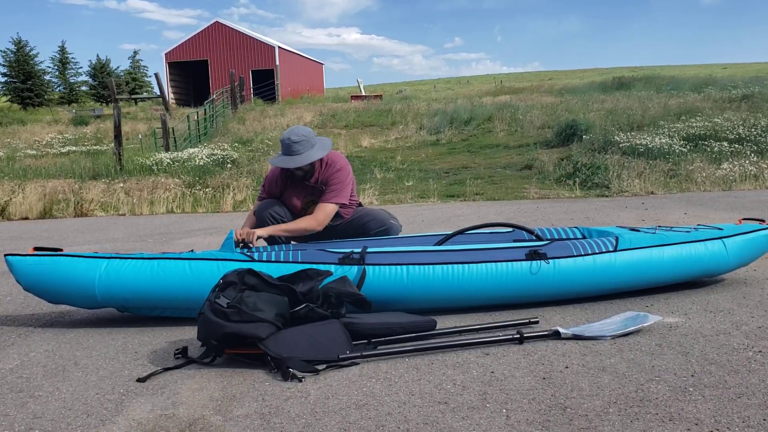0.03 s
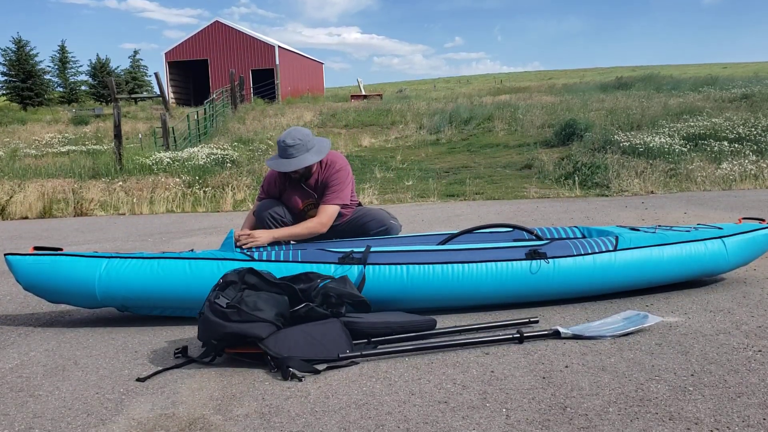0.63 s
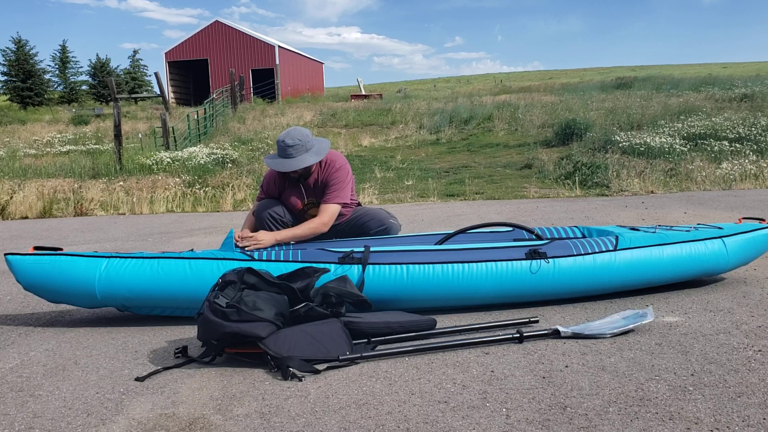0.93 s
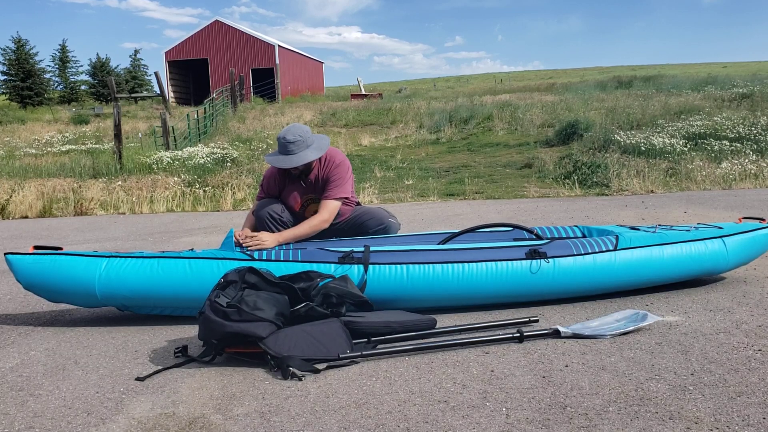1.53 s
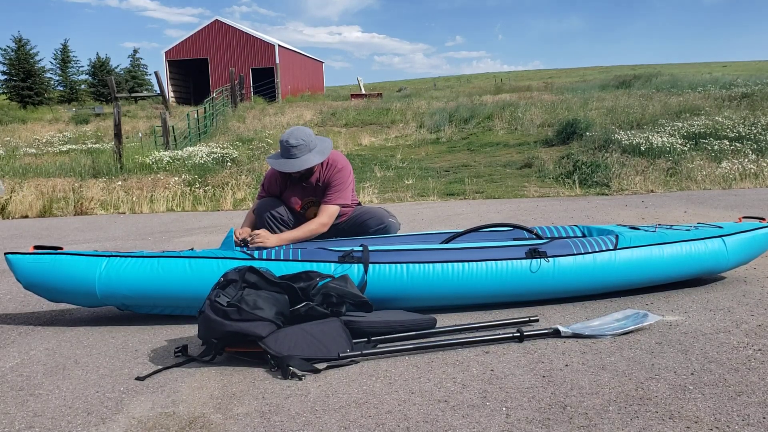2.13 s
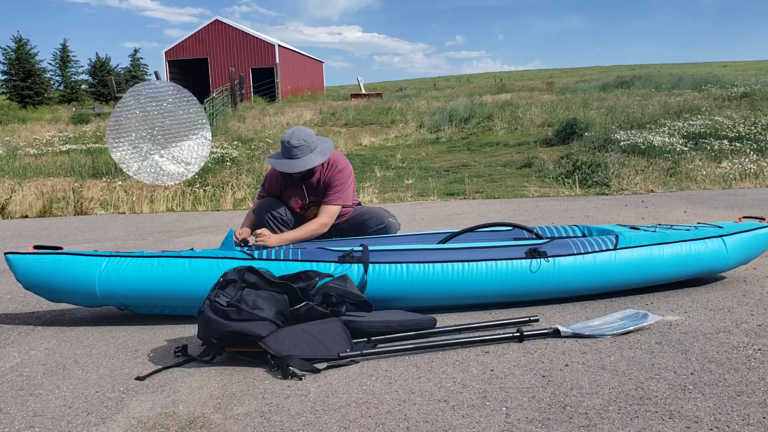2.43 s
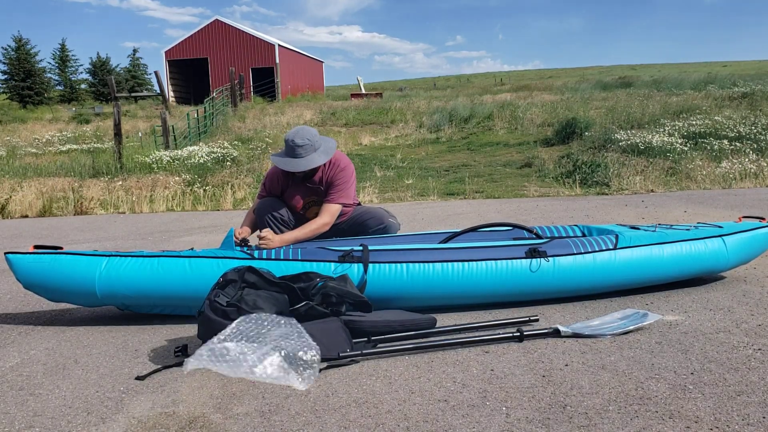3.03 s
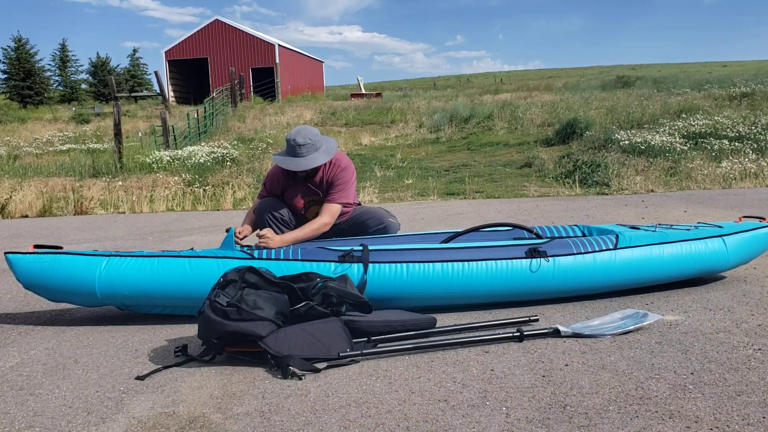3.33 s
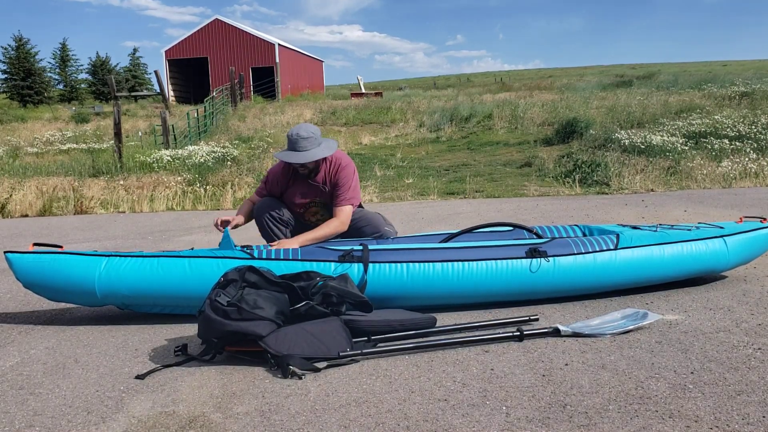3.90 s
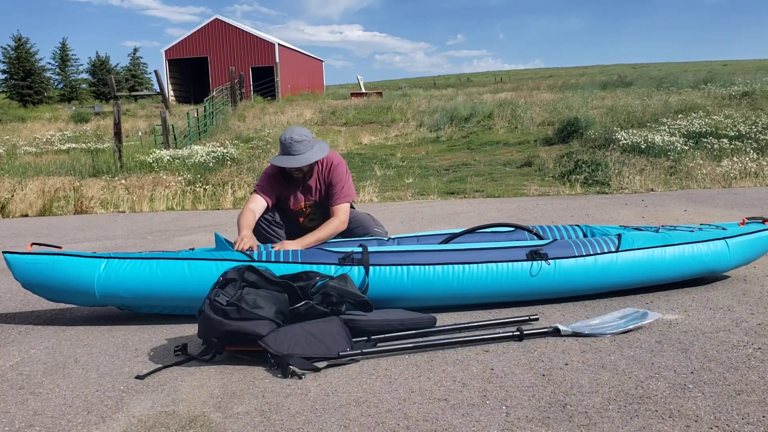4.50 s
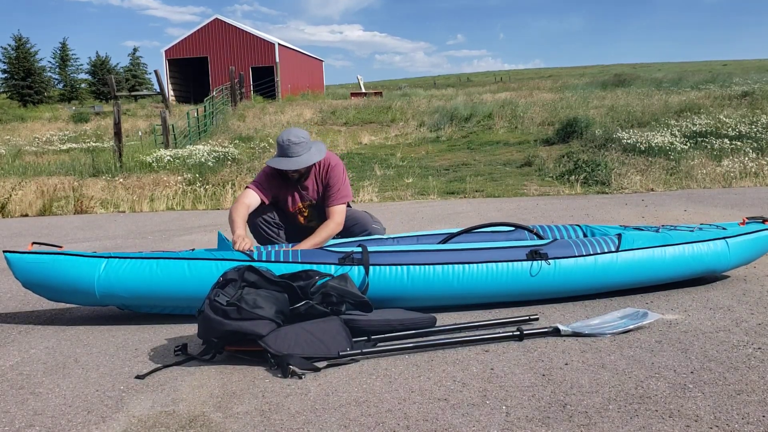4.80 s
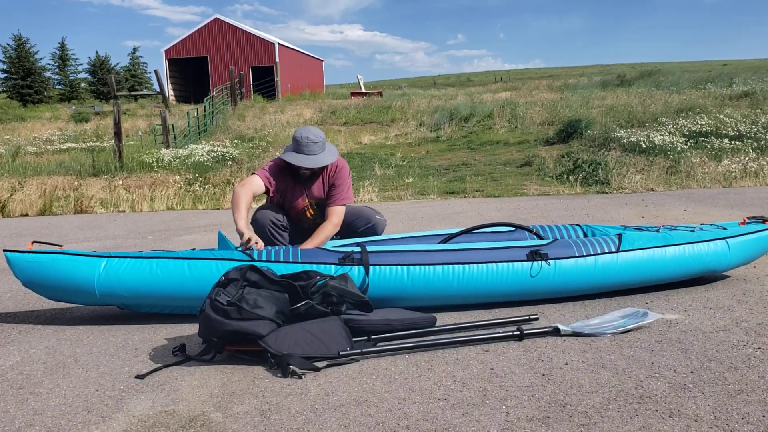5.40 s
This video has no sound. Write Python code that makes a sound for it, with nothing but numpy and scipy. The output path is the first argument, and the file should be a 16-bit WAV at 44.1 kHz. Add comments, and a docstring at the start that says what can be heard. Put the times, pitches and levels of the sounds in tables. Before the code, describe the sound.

Amid dull knocks and gusty wind rumble, air spurts from a kayak valve, blasts out and hisses away.

```python
"""Letting the air out of a kayak

Outdoors, hands rustle and squeak on an inflatable kayak. Air seeps past the cap, then the valve spits
twice, opens with a blast and hisses out as the pressure falls. Wind buffets the two microphone ports,
mixed with sharper handling knocks. Birds twitter far off, and a thin whistle arches near the end."""
import sys
import numpy as np
from scipy import signal
from scipy.fft import rfft, irfft, next_fast_len
from scipy.io import wavfile
from scipy.ndimage import map_coordinates

SR = 44100
rng = np.random.default_rng(int(sys.argv[2]) if len(sys.argv) > 2 else 0)


def file_out(sig):
    """Save sig as 16-bit WAV at sys.argv[1]."""
    # one column per channel
    cols = np.atleast_2d(sig).T
    # limit, then scale
    lim = np.clip(cols, -1, 1)
    pcm = np.round(lim * 32767).astype(np.int16)
    wavfile.write(sys.argv[1], SR, pcm)


N = 244755
TIME = np.arange(N) / SR

# Hands stroke the kayak's skin. Each row: start in seconds, level in dB, length in seconds.
HAND_STROKES = [(0.0, -54.5, 0.0057), (.31, -64, 0.065), (.6, -60.5, .22), (.69, -53, 0.41),
                (1.15, -50.5, 0.18), (1.56, -59.5, 0.057), (4.78, -61, 0.088), (5.275, -61.5, 0.017),
                (5.44, -61, .1)]
# Fingers tick on the plastic. Each row: start in seconds, level in dB.
FINGER_TICKS = [(0.696, -44), (0.836, -40.5), (0.897, -36.5), (1.013, -42), (1.228, -42), (2.1, -46),
                (3.55, -25.5)]
# The wind on the ports. Each row: time in seconds, strength in dB.
WIND_STRENGTH = [(0.0, -56.5), (0.49, -45.5), (0.55, -37.5), (1.06, -43.0), (1.21, -35), (1.6, -38.5),
                 (1.63, -50.5), (1.82, -25.5), (1.96, -53), (2.11, -34.5), (2.28, -64), (2.41, -53.0),
                 (2.59, -68.5), (2.69, -53), (2.77, -57), (2.9, -51.5), (3.52, -34.5), (3.63, -50.0),
                 (3.8, -41), (4.35, -49.5), (4.68, -42.5), (4.8, -54), (4.87, -51.5), (5.25, -55.5),
                 (5.33, -38.0), (5.54, -41)]
# Big swirls of air thump the ports. Each row: start in seconds, level in dB.
WIND_THUMPS = [(0.032, -42), (0.193, -43), (.545, -32.5), (0.674, -32.5), (0.819, -30.5), (.95, -39),
               (1.22, -29), (1.816, -30), (1.869, -25.5), (2.83, -45.5), (3.329, -26.5), (3.678, -34),
               (4.099, -38), (4.58, -37.5), (4.66, -41)]
# Skin drags on rubber. Each row: start in seconds, level in dB, length in seconds, pitch in Hz.
RUBBER_SQUEAKS = [(0.043, -51, 0.0065, 1340), (1.193, -58.5, 0.13, 2600), (1.26, -44, 0.012, 1590),
                  (1.321, -50, 0.0072, 1630), (2.131, -58, 0.22, 2780), (4.248, -39, 0.032, 650),
                  (4.388, -56, 0.022, 2310), (4.769, -59.5, 0.058, 1000)]
# Dull wind buffets on the microphone, mixed with sharper handling knocks.
# Each row: start in seconds, level in dB, pitch in Hz, slap boost in dB.
BUFFETS_AND_KNOCKS = [(0.604, -26.5, 338, -15), (0.814, -28, 338, -28), (1.227, -23.5, 260, -7.5),
                      (1.25, -25.5, 450, -11), (1.442, -46, 376, -21), (1.514, -26, 389, -17),
                      (1.718, -29.5, 637, -10), (1.752, -16.5, 259, -28), (1.767, -21.5, 345, -28),
                      (1.813, -16, 401, -28), (1.859, -17, 389, -38), (1.92, -39.5, 414, 1),
                      (1.979, -31, 353, -1), (2.037, -30, 380, -35), (2.326, -36.5, 527, -30),
                      (2.647, -29.5, 309, -9), (3.103, -32, 547, -25), (3.159, -32, 673, 2),
                      (3.273, -30.5, 340, 3), (3.317, -22, 396, -8.5), (3.342, -15.5, 333, -4.5),
                      (3.526, -23, 416, -32.5), (3.813, -25.5, 322, -3), (3.906, -23, 396, -5),
                      (3.923, -21.5, 366, -1), (4.506, -27, 324, -5), (4.633, -27.5, 450, -40),
                      (4.878, -37, 345, -24)]
# Spurts of leaking air. The rows up to 2.7 s pass the cap; the last two are a faint leak at the valve between
# spits and a puff as the pin lets go. Each row: start in seconds, level in dB, length in seconds.
LEAK_SPURTS = [(2.06, -51.5, 0.029), (2.245, -56.5, 0.042), (2.378, -51.5, 0.028), (2.495, -57.5, 0.063),
               (2.575, -43, 0.0029), (2.632, -42.5, 0.018), (3.21, -55, .14), (4.43, -54, 0.1)]
# The valve pin is pressed. Each row: start in seconds, level in dB, length and fade time in seconds.
PIN_PRESSES = [(3.08, -30.5, 0.019, 0.1), (3.148, -23.5, 0.011, 0.083), (3.16, -17.5, 0.0026, 0.022),
               (3.192, -34.5, 0.0055, 0.11), (3.349, -23, 0.014, 0.049), (3.361, -18.5, 0.022, 0.068),
               (3.819, -43.5, 0.027, 0.11), (4.243, -43, .021, 0.17), (4.367, -48.5, 0.031, 0.16)]
# The notes of the valve's hollow well. Each row: pitch in Hz, width in Hz, level in dB.
WELL_NOTES = [(615, 63, -3), (1155, 36, -1.5), (1390, 190, -4.5), (1580, 65, 2), (1805, 140, -4),
              (2025, 150, -9), (2203, 31, -6)]
# Breathy tones at the valve's lip. Each row: settled pitch in Hz, extra pitch at the opening in Hz,
# level in dB compared with the flow, fade in dB per second, width in Hz.
VALVE_LIP_TONES = [(4460, 830, -2.5, 16.5, 510), (10000, 71, -6.5, 20, 440)]
# The whistle's path. Each row: time in seconds, pitch in Hz, level in dB.
WHISTLE_PATH = [(4.5, 6100, -82), (4.58, 6150, -67), (4.72, 6770, -68), (4.85, 6100, -81), (5.3, 4960, -78),
                (5.55, 4450, -82)]

# The tone colours of the noises. Each row: frequency in Hz, relative level in dB.
RUB_COLOUR = [(700, 10.5), (1500, 2), (2600, -3), (4000, -2.5), (6000, 0.5), (8000, -3), (10500, 1.5),
              (15500, -3.5)]  # hands on the kayak
TICK_COLOUR = [(1500, -7), (4000, -6), (7000, -2), (11000, 1), (15500, -2)]  # fingers on plastic
RUMBLE_COLOUR = [(15, -14), (30, -15), (55, -0.5), (100, -1), (170, -7.5), (300, -22), (600, -16),
                 (1500, -82)]  # deep wind
FLUTTER_COLOUR = [(60, -14), (150, -11), (280, -1), (410, -1), (580, -10.5), (800, -17), (1200, -25),
                  (1800, -42.5), (3000, -65), (8000, -86)]  # hollow wind
FIELD_COLOUR = [(40, 23.5), (150, -16), (450, 21.5), (900, 8.5), (1500, 8.5), (2500, -3), (4400, -5),
                (6400, 2.5), (7400, -4.5), (8300, -10), (9100, -1.5), (10500, 5.5), (13500, -2.5),
                (15500, 4.5)]  # the open field
SHUDDER_COLOUR = [(40, -30), (120, -7.5), (250, 4), (400, 2.5), (600, 0.5), (900, -19.5), (1400, -27.5),
                  (2200, -76), (6000, -93)]  # the dull part of a buffet or knock
SLAP_COLOUR = [(400, 5), (800, 7), (1200, 8), (1700, -3), (2500, -16), (4500, -21), (9000, -25)]  # its sharper slap
LEAK_COLOUR = [(900, 1.5), (1800, -1.5), (2600, -2.5), (3500, -4), (4500, -3.5), (5400, 3), (6600, 4.5),
               (7700, -4), (9000, -3), (11500, 1.5), (13500, -2), (15500, 1.5)]  # thin leaking air, past the cap and later at the valve
SPIT_COLOUR = [(300, -8), (700, -6), (1000, -9), (1500, 0.5), (2100, -3.5), (2700, -1), (3600, -2.5),
               (4400, 3.5), (5700, -2), (6900, 0.5), (8700, -5), (10200, 5), (12800, 1.5), (14700, 5.5),
               (16000, -4)]  # the spitting valve
FLOW_COLOUR = [(300, -29), (700, -59), (1050, 0), (1550, 2.5), (2050, -5), (2600, -3.5), (3400, -1),
               (4500, -1), (5900, -11), (6900, -3.5), (8500, -10), (10100, -18), (12800, -5), (15200, -6.5)]  # the open valve's main hiss
TREBLE_COLOUR = [(6000, -12), (9200, -13.5), (10000, -5.5), (11200, -11), (12000, -7), (13000, -4),
                 (14800, -10), (16000, 0)]  # its bright top

OPEN_S, SHUT_S = 3.385, 4.45  # the pin stays down between these times


def amp(db):
    """Turn decibels into a gain."""
    return np.exp(np.maximum(db, -200) * (np.log(10) / 20))


def unit(x):
    """Scale a signal to an average (rms) level of 1."""
    return x / np.sqrt(np.mean(x ** 2) + 1e-20)


def curves(rows):
    """Join rows into one unbroken line for each column after the time."""
    times, *columns = np.transpose(rows)
    return [np.interp(TIME, times, column) for column in columns]


def gate(start, end, rise, t60):
    """Swell from start, hold until end, then fade by 60 dB every t60 seconds."""
    return (1 - np.exp(-np.maximum(TIME - start, 0) / rise)) * amp(-60 * np.maximum(TIME - end, 0) / t60)


def bursts(rows, rise, t60):
    """The combined strength of bursts that all swell and fade alike."""
    return np.sqrt(sum((amp(db) * gate(s, s + length, rise, t60)) ** 2 for s, db, length in rows))


def wobble(rate):
    """A smooth curve through `rate` random points a second."""
    return map_coordinates(rng.standard_normal(int(N * rate / SR) + 4), [TIME * rate])


def filtered(x, response):
    """Turn each frequency up or down by the gain that `response` gives it."""
    n = x.shape[-1]
    padded = next_fast_len(n + 8192)
    return irfft(rfft(x, padded) * response(np.fft.rfftfreq(padded, 1 / SR)), padded)[..., :n]


def coloured(x, colour):
    """Give a signal a tone colour, at level 1."""
    points_hz, db = np.transpose(colour)
    return unit(filtered(x, lambda hz: amp(np.interp(np.log(hz + 1), np.log(points_hz), db))))


def noise(colour, samples=N):
    """Coloured noise, different at the two ports."""
    return coloured(rng.standard_normal((2, samples)), colour)


def band(x, centre_hz, width_hz):
    """Keep mostly the frequencies near centre_hz."""
    return filtered(x, lambda hz: 1 / (1 + (2 * (hz - centre_hz) / width_hz) ** 2))


def breathy(hz, width_hz):
    """A narrow band of noise around a pitch that may glide."""
    drift = band(rng.standard_normal((2, 2, N)), 0, width_hz)
    phase = 2 * np.pi * np.cumsum(hz * np.ones(N)) / SR
    return unit(drift[0] * np.cos(phase) + drift[1] * np.sin(phase))


def rush(colour, lag_ms, echo, t60, wash, merge_hz=1400):
    """Rushing noise heard directly, as quick echoes off hull and ground, and as a wash from all around."""
    t = np.arange(SR // 25) / SR
    paths = rng.standard_normal((2, len(t))) * amp(-60 * t / t60) * (t > 0.003)
    paths *= echo / np.linalg.norm(paths, axis=1, keepdims=True)
    lag = round(lag_ms * SR / 1000)  # the direct sound reaches one port first
    paths[0, max(-lag, 0)] += 1
    paths[1, max(lag, 0)] += 1
    air = rng.standard_normal(N)
    left, right = [signal.fftconvolve(air, p, "same") + wash * rng.standard_normal(N) for p in paths]
    # long waves reach both ports more alike
    side = filtered(left - right,
                    lambda hz: np.hypot(0.4, (hz / merge_hz) ** 2) / np.hypot(1, (hz / merge_hz) ** 2))
    return coloured(np.array([left + right + side, left + right - side]), colour)


def hands(slips_per_s=45, crackle_db=4.5, crackle_t60=0.0071):
    """The tight skin crackles as it sticks and slips under the hands; fingers tick on plastic."""
    slips = (rng.random(N) < slips_per_s / SR) * rng.exponential(1, N)
    crackle = signal.lfilter([1], [1, -amp(-60 / (crackle_t60 * SR))], slips)
    grain = unit(amp(0.76 * wobble(300) + 1.6 * wobble(50)) * np.hypot(1, amp(crackle_db) * crackle))
    strokes = bursts(HAND_STROKES, rise=0.0027, t60=0.53)
    rub = strokes * grain * rush(RUB_COLOUR, lag_ms=0.43, echo=1.8, t60=0.037, wash=0.75)
    ticks = sum(amp(db) * gate(s, s + 0.0011, rise=0.00074, t60=0.014) for s, db in FINGER_TICKS)
    return rub + ticks * noise(TICK_COLOUR)


def wind():
    """Wind makes a deep rumble and a hollow flutter; each port gets its own small swirls."""
    wind_db = curves(WIND_STRENGTH)[0]
    swirls = np.array([wobble(45), wobble(45)])
    thumps = sum(amp(db) * gate(s, s + 0.03, rise=0.0072, t60=0.047) for s, db in WIND_THUMPS)
    rumble = amp(wind_db + 0.5) * unit(amp(3.87 * swirls + 1.5 * wobble(14)))
    flutter = amp(wind_db - 1) * unit(amp(4.84 * swirls))
    return np.hypot(rumble, thumps) * noise(RUMBLE_COLOUR) + flutter * noise(FLUTTER_COLOUR)


def field():
    """The quiet hiss of the open field."""
    return amp(-58.5) * noise(FIELD_COLOUR)


def birds(count=1800, pitch_hz=5780, spread=0.037, fall=0.11, chirp_s=0.012, level_db=-67):
    """A far flock: many short, falling chirps blur into a twitter."""
    t = np.arange(SR // 60) / SR
    progress = np.clip(t / chirp_s, 0, 1)
    jitter, pitch, size, *phases = rng.standard_normal((count, 5)).T[:, :, None]
    cycles = np.cumsum(pitch_hz * np.exp(spread * pitch - fall * (progress - 0.5)), axis=1) / SR
    starts = (np.clip((np.arange(count)[:, None] + jitter) / count, 0, 1) * N).astype(int)
    places = starts + np.arange(len(t))
    swell = amp(3.5 * size) * np.sin(np.pi * progress) ** 2
    chirps = [swell * np.sin(2 * np.pi * (cycles + phase)) for phase in phases]
    flock = np.array([np.bincount(places.ravel(), chirp.ravel(), N)[:N] for chirp in chirps])
    return amp(level_db) * unit(flock * amp(0.77 * wobble(6.8)))


def squeaks(width_share=0.37):
    """Each drag of skin on rubber makes a short, hoarse band of noise around its pitch."""
    out, t = np.zeros((2, N + SR)), np.arange(SR // 3) / SR
    for start, db, length, hz in RUBBER_SQUEAKS:
        rasp = band(rng.standard_normal((2, len(t))), hz, width_share * hz)
        stroke = (1 - np.exp(-t / 0.0008)) * amp(-60 * np.maximum(t - length, 0) / 0.076)
        out[:, round(start * SR):][:, :len(t)] += amp(db) * stroke * unit(rasp)
    return out[:, :N]


def buffets_and_knocks(ring_t60=0.059, slap_t60=0.058, sway_db=0.74):
    """Each wind buffet or handling knock is a brief low tone, a rough shudder and a short slap."""
    out, t = np.zeros((2, N + SR)), np.arange(SR // 4) / SR
    for start, db, hz, slap_db in BUFFETS_AND_KNOCKS:
        ring = np.sin(2 * np.pi * hz * t + rng.uniform(-0.43, 1.23, (2, 1)))
        shudder, slap = noise(SHUDDER_COLOUR, len(t)), noise(SLAP_COLOUR, len(t))
        bump = (ring + 0.98 * shudder) * (1 - np.exp(-t / 0.0025)) * amp(-60 * t / ring_t60)
        slap *= (1 - np.exp(-t / 0.00053)) * amp(slap_db - 11 - 60 * t / slap_t60)
        port_gains = amp(db + 2 + sway_db * rng.standard_normal((2, 1)))
        out[:, round(start * SR):][:, :len(t)] += (bump / np.abs(bump).max() + slap) * port_gains
    return out[:, :N]


def cap_leak(start_s=2.036, end_s=2.324, fall_db_per_s=28.5):
    """A thin, sputtering leak starts and fades as the cap is turned, with a few spurts; two later leaks at the
    valve share the same thin hiss."""
    seep_db = -44 - fall_db_per_s * np.maximum(TIME - start_s, 0)
    sputter_db = 2.6 * wobble(130) + 1.5 * wobble(30.02)
    leak = amp(seep_db + sputter_db) * gate(start_s, end_s, rise=0.014, t60=0.93)
    spurts = bursts(LEAK_SPURTS, rise=0.0016, t60=0.1)
    return (leak + spurts) * rush(LEAK_COLOUR, lag_ms=0.34, echo=0.85, t60=0.032, wash=0.84)


def spit_strength(rise_share=0.57):
    """Each press of the pin lets out a rough puff that swells for part of its length."""
    power = sum((amp(db) * gate(s, s + length, rise_share * length, t60)) ** 2
                for s, db, length, t60 in PIN_PRESSES)
    return np.sqrt(power) * amp(1.9 * wobble(300))


def well_ring():
    """Air blowing across the valve's well makes it ring, a little louder on the left."""
    def response(hz):
        return sum((-1) ** k * amp(db) * 1j * hz * width / (pitch ** 2 - hz ** 2 + 1j * hz * width)
                   for k, (pitch, width, db) in enumerate(WELL_NOTES))
    draught = rng.standard_normal(N) + 0.6 * rng.standard_normal((2, N))
    return unit(filtered(draught, response)) * amp([[1.2], [-1.2]])


def valve_hiss(age, flow, surge_db=28, surge_s=0.22, sag_s=0.13, pinch_s=4.39):
    """The hiss starts with a bright surge; as the pressure falls it fades and the lip tones sag."""
    treble = amp(-52 + surge_db * np.exp(-age / surge_s))
    hiss = flow * rush(FLOW_COLOUR, lag_ms=-0.19, echo=0.69, t60=0.038, wash=0.6)
    hiss += treble * rush(TREBLE_COLOUR, lag_ms=-0.2, echo=0.61, t60=0.054, wash=0.4)
    waver_hz = 67.8 * wobble(25)
    for settled_hz, extra_hz, db, fade, width_hz in VALVE_LIP_TONES:
        pitch_hz = settled_hz + waver_hz + extra_hz * np.exp(-age / sag_s)
        hiss += flow * amp(db - fade * age) * breathy(pitch_hz, width_hz)
    # the lip sings louder up to the moment the gap narrows
    pinch = amp(-50 - 58 * np.maximum(pinch_s - TIME, 0)) * gate(OPEN_S, pinch_s, rise=0.01, t60=0.29)
    return hiss + pinch * breathy(10280 + waver_hz, width_hz=600)


def valve(empty_s=1.22):
    """The pin spits, then stays down while the pressure runs out; spits and flow both ring the well."""
    age = np.maximum(TIME - OPEN_S, 0)
    pressure = np.maximum(1 - age / empty_s, 0)
    flow = amp(-39) * pressure ** 2.3
    opening = gate(OPEN_S, SHUT_S, rise=0.0057, t60=1.0) * amp(1.2 * wobble(70))
    hiss = opening * valve_hiss(age, flow)
    spits = spit_strength()
    blast = spits * rush(SPIT_COLOUR, lag_ms=-0.54, echo=1.8, t60=0.035, wash=0.74)
    ring = (amp(-7) * spits + amp(-6) * flow * opening) * well_ring()
    return hiss + blast + ring


def whistle(upper_ratio=1.2, upper_db=-4.5):
    """Two thin tones arch together, then sink and fade."""
    hz, db = curves(WHISTLE_PATH)
    return amp(db) * (breathy(hz, width_hz=150) + amp(upper_db) * breathy(upper_ratio * hz, width_hz=200))


def scene():
    """Add the kayak's sounds and everything around them."""
    kayak = valve() + cap_leak() + hands() + squeaks()
    return kayak + wind() + buffets_and_knocks() + birds() + whistle() + field()


def record(dry, top_hz=15900):
    """The camera keeps nothing above top_hz."""
    return filtered(dry, lambda hz: hz < top_hz)


dry = scene()
out = record(dry)
file_out(out)
```